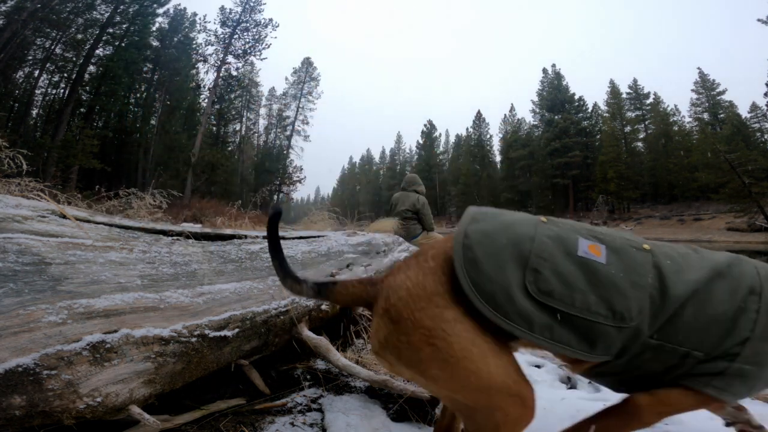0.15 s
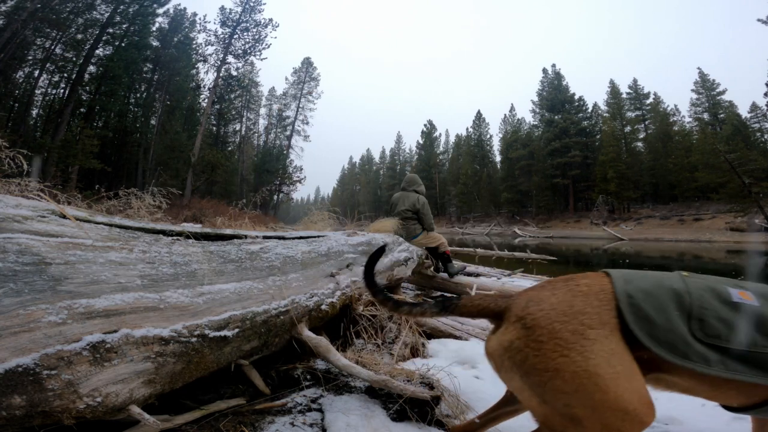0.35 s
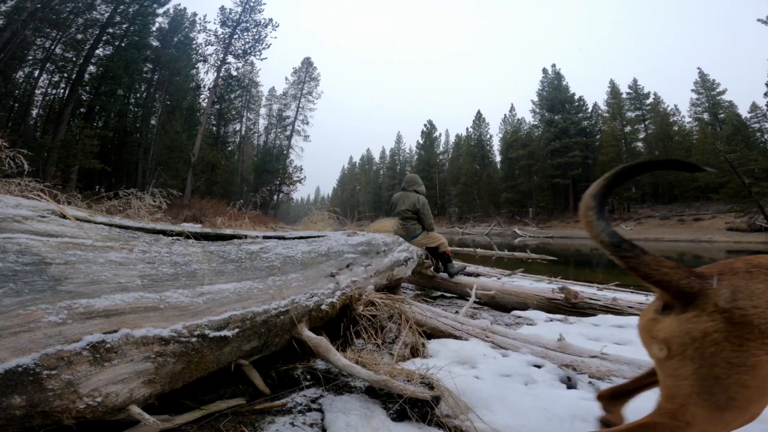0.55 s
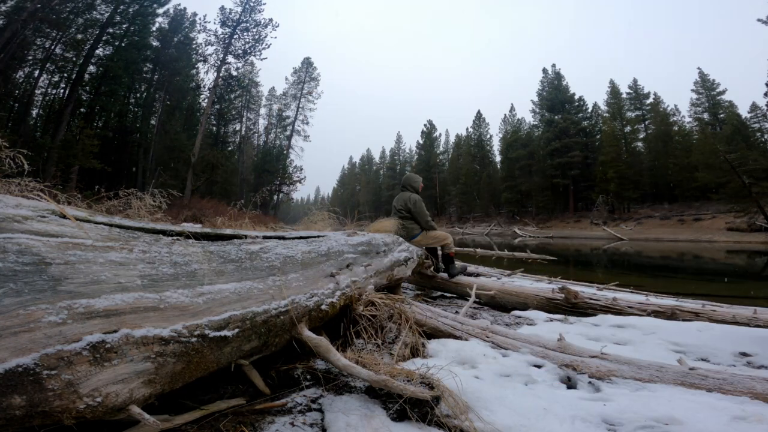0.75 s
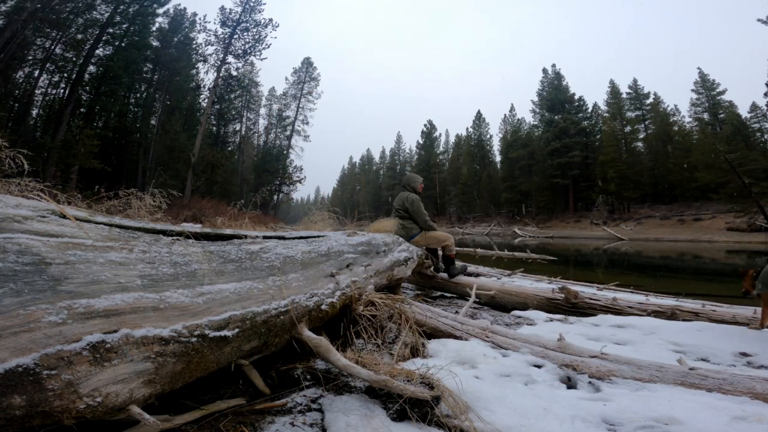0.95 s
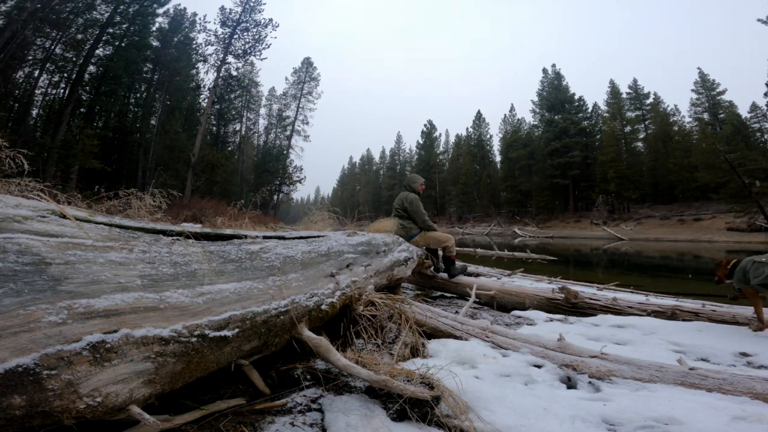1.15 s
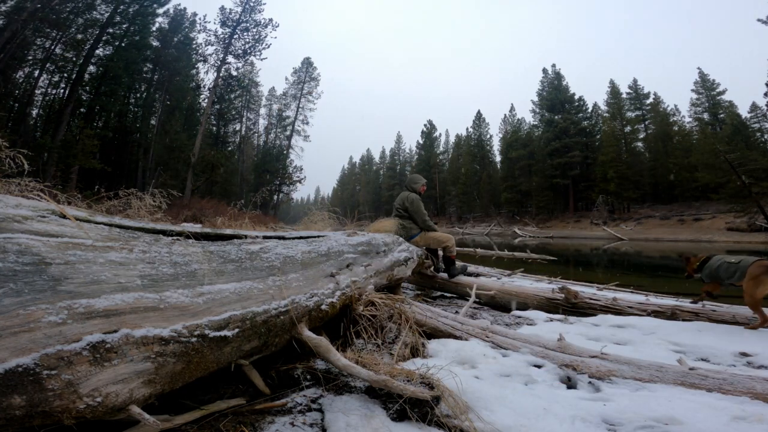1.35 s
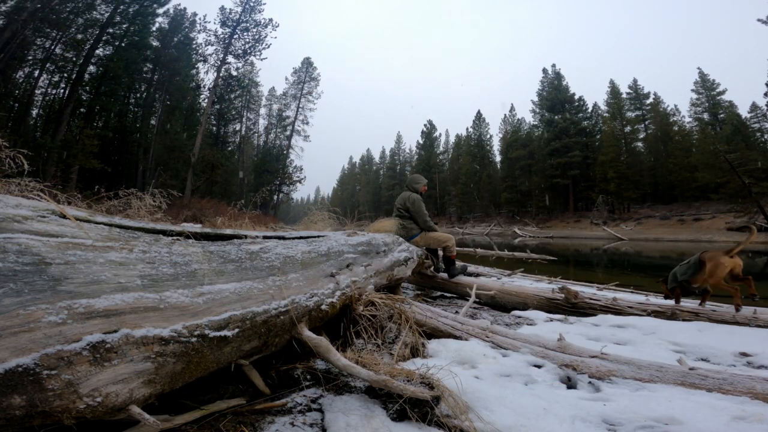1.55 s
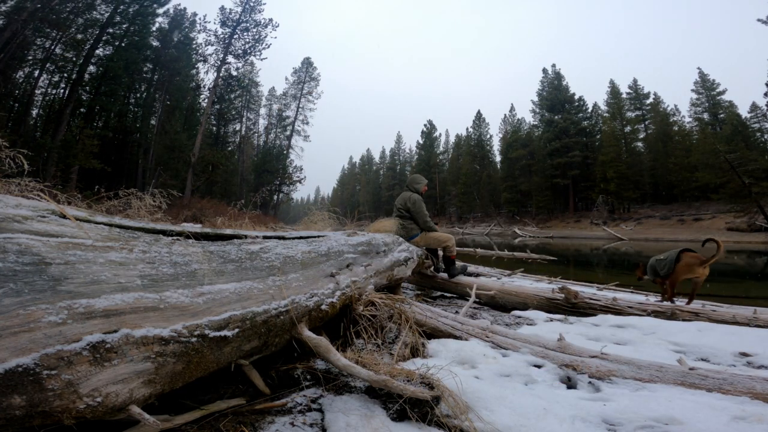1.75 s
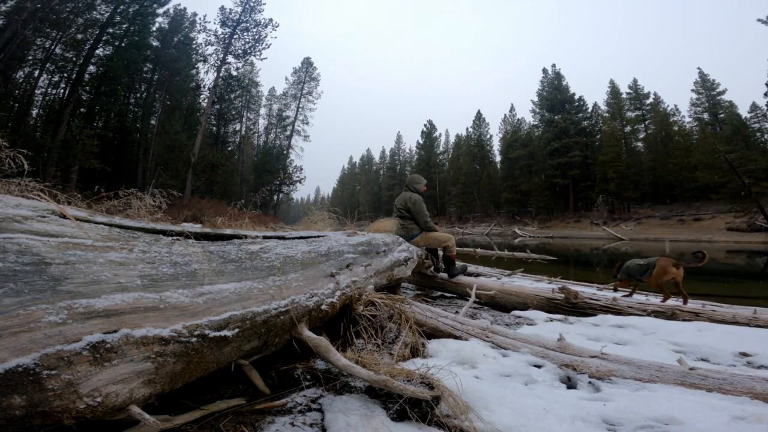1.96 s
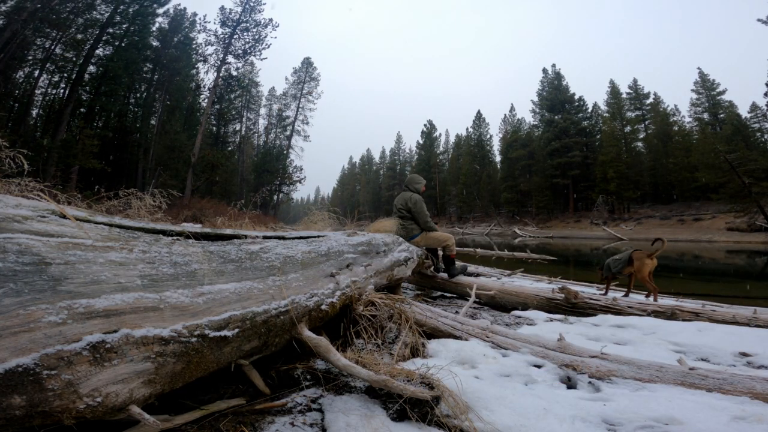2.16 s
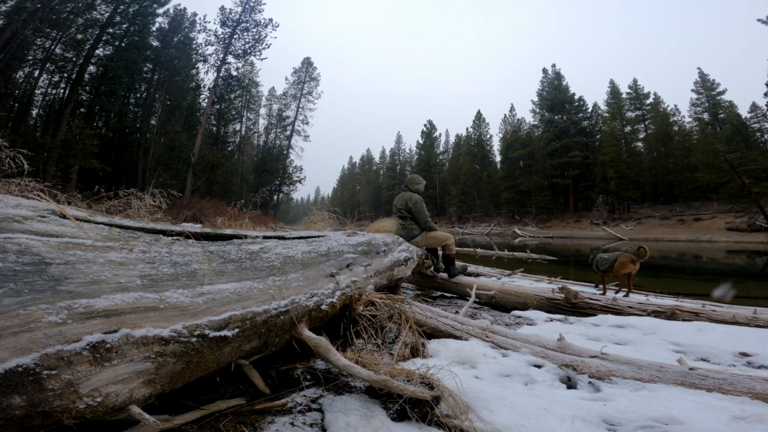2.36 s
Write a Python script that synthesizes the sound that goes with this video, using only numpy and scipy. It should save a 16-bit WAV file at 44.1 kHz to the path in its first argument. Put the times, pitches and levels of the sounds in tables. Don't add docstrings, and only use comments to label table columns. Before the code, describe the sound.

A dog's paws land with a loud crunch on frosty brush, then trot away, snapping twigs

```python
import sys
import numpy as np
from scipy import signal
from scipy.fft import rfft, irfft
from scipy.io import wavfile
from scipy.ndimage import uniform_filter1d, map_coordinates

SR = 44100
rng = np.random.default_rng(int(sys.argv[2]) if len(sys.argv) > 2 else 0)


def master_out(mix):
    frames = np.transpose(np.atleast_2d(mix))
    ceiling = np.clip(frames, -1, 1)
    pcm = np.round(ceiling * 32767).astype(np.int16)
    wavfile.write(sys.argv[1], SR, pcm)


def voltage_ratio(level):
    return 10 ** (np.asarray(level, float) / 20)


N = 110250
T = np.arange(N) / SR

# f/Hz, level/dB
SOFT_GROUND = [(90, -23), (135, -9), (175, 1), (260, -6), (520, -6.5), (720, -21.5), (1500, -66)]


def unit(x):
    return x / np.sqrt(np.mean(x ** 2) + 1e-20)


def noise():
    return rng.standard_normal((2, N))


def wobble(rate):
    knots = rng.standard_normal(int(N * 900 / SR) + 4)
    return map_coordinates(knots, [T * min(rate, 900)])


def sine(hz):
    return np.sin(2 * np.pi * np.cumsum(hz) / SR)


def coloured(x, points):
    f, db = np.transpose(points)
    hz = np.fft.rfftfreq(8192, 1 / SR)
    response_db = np.interp(np.log(hz + 1), np.log(f), db, -90, -90)
    cepstrum = irfft(np.log(voltage_ratio(response_db)))
    cepstrum[1:4096] *= 2
    cepstrum[4097:] = 0
    impulse = irfft(np.exp(rfft(cepstrum)))
    return signal.fftconvolve(x, impulse[None], axes=1)[:, :N]


def patchy(x, depth_db):
    z = signal.stft(x, nperseg=128)[2]

    def blur(bins, frames):
        field = rng.standard_normal(z.shape[1:])
        return unit(uniform_filter1d(uniform_filter1d(field, bins, 0), frames, 1))

    field = blur(3, 3) + .6 * blur(9, 20)
    return signal.istft(z * voltage_ratio(depth_db * field), nperseg=128)[1][:, :N]


def placed(pair, wide, left_db):
    centre, spread = pair[0], wide * pair[1]
    return np.array([centre + spread, centre - spread]) * voltage_ratio([[left_db / 2], [-left_db / 2]])


def gate(s, length, edge):
    rise = T - s + (s <= 0)
    fall = s + length + edge - T
    return np.clip(np.minimum(rise, fall) / edge, 0, 1)


def tail(x, t60):
    t = np.arange(SR) / SR
    h = rng.standard_normal((2, SR)) * voltage_ratio(-60 * t / t60) * (t > .012)
    return signal.fftconvolve(x[None], h / np.linalg.norm(h[0]), axes=1)[:, :N]


def river():
    # f/Hz, level/dB
    water_colour = [(30, -11.5), (115, -21.5), (155, 2), (200, -1.5), (500, -26), (5400, -24.5),
                    (8500, -29.5), (15500, -43.5)]
    # t/s, f/Hz, level/dB
    bubble = [
        (2.15, 240, -80),
        (2.21, 305, -67),
        (2.28, 215, -70),
        (2.4, 215, -82),
    ]
    s, hz, db = np.transpose(bubble)
    gurgle = voltage_ratio(np.interp(T, s, db, -120, -120)) * sine(np.interp(T, s, hz))
    ebb = voltage_ratio(-6 * np.clip((T - 2.15) / .1, 0, 1))
    murmur = unit(coloured(noise(), water_colour)) * voltage_ratio(-64 + 1.53 * wobble(12))
    murmur = murmur + (ebb - 1) * uniform_filter1d(murmur, size=12)
    return placed(murmur, wide=0.71, left_db=-3.5) + gurgle


def trees(bark, middle, far):
    # f/Hz, level/dB
    trunk_colour = [(200, -32), (1800, 7), (6500, -1), (15000, -43)]
    ring = tail(uniform_filter1d(bark * wobble(600), size=7), t60=1.7)
    steps = (middle + .5 * far).mean(0)[None]
    echo = tail(coloured(steps, trunk_colour)[0] * (T > .8), t60=0.46)
    return voltage_ratio(2.5) * ring + voltage_ratio(-14.5) * echo


def squirrel():
    # t/s, level/dB, start f/Hz, sag/(Hz/s), low note level/dB
    calls = [
        (0.823, -56, 4780, 24400, -83),
        (0.944, -48, 4910, 24700, -54),
        (1.065, -46.5, 4840, 21700, -51.5),
        (1.189, -44, 4810, 19620, -58),
        (1.316, -47.5, 5090, 28200, -54.5),
        (1.447, -46, 4810, 14040, -51.5),
        (1.736, -60, 4680, 15700, -61.5),
    ]
    bark_s, plunge_s, plunge_db, plunge_hz_per_s = 0.032, .017, -14, 69000
    low_s, low_at_s, low_hz = .024, 0.02326, 2460
    yip_hz, yip_arch = 5600, 2.5e7
    shake = 85 * wobble(300)
    x = 0
    for s, db, start_hz, sag, low_db in calls:
        u = np.clip(T - s, 0, .08)
        plunge = plunge_hz_per_s * np.clip(u - bark_s, 0, .022)
        hz = start_hz - sag * u - plunge - 350 * np.exp(-u / 0.0025)
        body = gate(s, bark_s * 0.72, 0.01)
        fall = gate(s + bark_s * 0.73, bark_s * 0.45 + plunge_s, 0.0035)
        x = x + voltage_ratio(db + 3.5) * (body + voltage_ratio(plunge_db) * fall) * sine(hz + shake)
        low = gate(s + low_at_s, low_s, .009) + .25 * gate(s, low_at_s, 0.009)
        glide_hz = low_hz + 300 * np.clip(1.5 - u / low_at_s, 0, 1)
        x = x + voltage_ratio(low_db + 1.5) * low * sine(glide_hz + shake)
        yip = sine(yip_hz - yip_arch * (u - .006) ** 2 + shake)
        x = x + voltage_ratio(low_db - 1) * gate(s, .01, 0.0028) * yip
    hoarse = 1 + .45 * wobble(900)
    return x * voltage_ratio(0.31 * wobble(200)) * hoarse


def squeaks():
    slips = [
        (0.688, 0.057, -56, 1346),
        (1.58, 0.02, -41.5, 1730),
        (1.588, 0.021, -34.5, 1680),
        (1.602, 0.026, -40.5, 1796),
        (1.661, 0.0094, -39, 1636),
        (1.853, 0.011, -52, 1940),
        (1.87, 0.0076, -35, 1880),
        (1.877, 0.0093, -34, 1895),
        (1.884, 0.0075, -40.5, 1880),
        (1.895, 0.011, -34.5, 1850),
    ]
    width_hz = 500
    flutter, unsteady = voltage_ratio(1.8 * wobble(width_hz)), 1.25 * wobble(width_hz)
    x = 0
    for s, d, db, hz in slips:
        swell = np.sin(np.pi * np.clip((T - s) / d, 0, 1) ** 0.82) ** 2
        x = x + voltage_ratio(db) * swell * np.sin(2 * np.pi * hz * T + unsteady)
    return flutter * x


def snaps():
    # t/s, peak level/dB, f/Hz
    breaks = [(0.2434, -17.5, 1490), (0.413, -38, 3100), (0.4395, -31.5, 8450), (0.5645, -22.5, 2100),
              (.6415, -39.5, 590), (0.93, -35, 1370), (.961, -43.5, 1170), (1.0071, -37.5, 3970),
              (1.9357, -36, 2400), (1.9778, -42.5, 2570), (1.986, -44, 4700), (2.035, -53, 1580),
              (2.0833, -53, 3020), (2.0957, -48, 3050), (2.1435, -50, 1790), (2.164, -37, 2950),
              (2.176, -38.5, 5140), (2.233, -54, 5060), (2.257, -52, 8700), (2.2669, -40, 5520),
              (2.358, -34.5, 7600), (2.359, -45.5, 3900), (2.457, -54, 11540)]
    cycles, crack_share = 39, 0.19
    x, t = np.zeros(N + 2000), np.arange(1500) / SR
    for s, db, hz in breaks:
        wide = round(SR / hz) + 2
        blunt = np.hanning(wide) / np.sqrt(wide / 3)
        crack = np.convolve(rng.standard_normal(1500), blunt, "same")
        ring = np.sin(2 * np.pi * hz * t) + crack_share * crack
        decay = voltage_ratio(db + 0.5 - 60 * t * (hz + 1500) / cycles)
        x[round(s * SR):][:1500] += decay * (1 - np.exp(-t / 0.00016)) * ring
    return x[:N]


def thumps():
    # start t/s, length/s, level/dB, f/Hz
    blows = [(0, 0.073, -50, 75), (0.206, 0.058, -41.5, 60), (0.238, 0.032, -33, 135),
             (0.266, 0.13, -42.5, 75), (0.334, 0.042, -44, 125), (0.556, 0.048, -44.5, 155),
             (0.577, 0.072, -53.5, 80), (0.636, 0.0089, -45, 110), (0.912, 0.023, -53, 330),
             (1.506, 0.041, -49, 68), (1.595, 0.024, -51.5, 145), (1.917, 0.058, -53.5, 160)]
    fade_db_per_s, rise_s = 42, 0.013
    rough = 1.5 * wobble(60)
    x = 0
    for s, d, db, hz in blows:
        weight = voltage_ratio(db + 3 - fade_db_per_s * np.clip(T - s, 0, d)) * gate(s, d, rise_s)
        x = x + weight * np.sin(2 * np.pi * hz * T + rough)
    return placed([x, np.roll(x, 90)], wide=.12, left_db=0.0)


def pressure(loads, packed, settle_db):
    load = 0
    for s, d, db, swell, low_db in loads:
        through = np.clip((T - s) / d, 0, 1) - .5
        load = load + gate(s, d, 0.0041) * voltage_ratio(db + packed * low_db + swell * through)
    keep = np.exp(-1 / (0.0067 * SR))

    def crumbs(v):
        return voltage_ratio(settle_db) * signal.lfilter([1 - keep], [1, -keep], v)

    creak = .5 * crumbs(load[::-1])[::-1]
    return np.maximum(load, np.maximum(crumbs(load), creak))


def crunch(loads, crust, dull, grains, lumpy_db, dull_db, settle_db, wide, left_db):
    # f/Hz, level/dB
    ear_spread = [(100, -10.5), (2800, 5), (9000, -0.5), (14500, 7.5)]
    u = rng.random((2, N))
    sizes = voltage_ratio(-1.8 * np.log(u[1] + 0.022))
    spikes = (u[0] < grains / SR) * sizes * noise()
    crystals = patchy(noise() + .8 * unit(spikes), depth_db=1.0)
    fizz = unit(coloured(crystals, crust) * voltage_ratio(lumpy_db * wobble(170)))
    push = unit(coloured(noise(), dull) * voltage_ratio(0.39 * wobble(59.64)))
    fizz = np.array([fizz[0], coloured(fizz[1:], ear_spread)[0]])
    low = signal.sosfiltfilt(signal.butter(2, 2200, fs=SR, output="sos"), fizz)
    load, packed = pressure(loads, 0, settle_db), pressure(loads, 1, settle_db)
    ground = push * voltage_ratio(dull_db) * uniform_filter1d(packed, size=300)
    return placed((fizz - low) * load + low * packed + ground, wide, left_db)


def far_bank():
    # start t/s, length/s, level/dB, swell over the length/dB, low part/dB
    far_loads = [(1.866, 0.029, -45.5, 0, 0.5), (1.895, 0.013, -42.5, -6, -3.5),
                 (1.909, 0.019, -43, -11.5, 0), (1.934, 0.0075, -44.5, -3, 0),
                 (1.976, 0.0058, -50, -3, 2.5), (1.984, 0.022, -54, -3, 5), (2.033, 0.01, -62.5, -22, 11),
                 (2.074, 0.025, -55.5, -5, 0), (2.141, 0.021, -56, -1, -2.5),
                 (2.162, 0.035, -57.5, -14, -5.5), (2.229, 0.0041, -58, 0, -21),
                 (2.255, 0.016, -66.5, 0, -13), (2.345, 0.036, -63.5, 1, -0.5),
                 (2.393, 0.022, -62.5, 6, -5), (2.412, 0.015, -62, -3, 5), (2.428, 0.016, -61.5, -11, 3)]
    # f/Hz, level/dB
    far_crust = [(500, -56), (900, -16), (1700, -4), (2900, -4), (4000, -6), (6300, -11), (15800, -36.5)]
    return crunch(far_loads, far_crust, SOFT_GROUND, grains=6700, lumpy_db=2.6, dull_db=-27.0,
                  settle_db=-3.5, wide=0.28, left_db=-3.5)


def trotting():
    # start t/s, length/s, level/dB, swell over the length/dB, low part/dB
    trot_loads = [(.687, 0.0069, -47, -6, -1.5), (.698, 0.023, -58, -5, 3), (.717, 0.006, -58.5, 3, -8),
                  (.741, 0.032, -52, -5.5, -3.5), (.83, 0.023, -52.5, 1, -5), (.852, 0.039, -50.5, -5, 1),
                  (.891, 0.0091, -47, -3, 4), (.906, 0.023, -50, 4, 4.5), (.928, .014, -44.5, -3, -0.5),
                  (.956, 0.0067, -50.5, 4, 3), (.968, 0.023, -57.5, 6, -1),
                  (1.003, 0.0094, -48.5, -2.5, 1.5), (1.066, 0.016, -56.5, 0, -2),
                  (1.1, 0.041, -52.5, -11, -1), (1.162, 0.021, -55, -6, 1), (1.186, 0.028, -47.5, -1, 1.5),
                  (1.233, 0.034, -52, 0, 0), (1.272, 0.0059, -53.5, -5, 0), (1.289, 0.0058, -45.5, 0.5, 4),
                  (1.325, 0.057, -57, 6.5, -2), (1.43, 0.011, -44.5, -3, 0.5),
                  (1.458, 0.017, -55.5, -4, -2), (1.485, 0.039, -50.5, -3, 3),
                  (1.523, 0.046, -51.5, -8.5, 1), (1.58, 0.025, -48.5, 5, 1), (1.605, 0.014, -41.5, -10, 5),
                  (1.622, 0.013, -52.5, -5, 5), (1.658, 0.0055, -51.5, -7, 7),
                  (1.725, 0.022, -64.5, -4, -1)]
    # f/Hz, level/dB
    trot_crust = [(500, -63), (900, -5), (1900, -4.5), (2800, -6.5), (4500, 0), (10000, -12),
                  (15800, -27.5)]
    fading_db = -6.0 - 12.5 * (T - 1)
    return crunch(trot_loads, trot_crust, SOFT_GROUND, grains=8100, lumpy_db=0.25, dull_db=fading_db,
                  settle_db=-3.5, wide=0.25, left_db=-1.5)


def landing():
    # start t/s, length/s, level/dB, swell over the length/dB, low part/dB
    near_loads = [(0, 0.02, -46, 4, 4), (.022, 0.012, -38, 4.5, -3), (.036, 0.11, -50, -4, -3),
                  (.12, 0.035, -43.5, 0.5, -5.5), (.154, 0.05, -32, 5.5, 0), (.203, 0.014, -21, 2, -7),
                  (.219, 0.02, -26, -1, 0.5), (.242, 0.03, -28, -21.5, 1.5), (.272, 0.02, -43, -1, 2),
                  (.292, 0.0314, -33.5, -2.5, 1), (.323, .023, -39.5, -0.5, 6.5),
                  (.347, 0.02, -36.5, -2, 6.5), (.369, 0.024, -40.5, -10, 7), (.393, 0.065, -52.5, 0, -7.5),
                  (.457, 0.043, -47.5, -3, -5), (.498, 0.06, -41.5, -4, 0), (.562, 0.0072, -27, -4.5, -2.5),
                  (.571, 0.025, -35, -4.5, 0.5), (.597, 0.037, -45.5, -6.5, -1),
                  (.639, 0.0066, -47, -7, 3.5), (.646, 0.0059, -51.5, -5, 3)]
    # f/Hz, level/dB
    near_crust = [(300, -37), (700, -6.5), (1500, -2.5), (3000, -5.5), (5400, -3), (10000, -12.5),
                  (15800, -33)]
    # f/Hz, level/dB
    near_ground = [(60, -52), (130, -7.5), (430, -6), (900, -12), (1800, -35)]
    return crunch(near_loads, near_crust, near_ground, grains=5200, lumpy_db=1.24, dull_db=-9,
                  settle_db=-43.5, wide=0.23, left_db=-1.15)


def scene():
    near, middle, far = landing(), trotting(), far_bank()
    paws = near + middle + far
    paws = paws + snaps() * voltage_ratio([[-.8], [.8]]) + squeaks() * voltage_ratio([[-2.5], [2.5]])
    bark = squirrel()
    return paws + thumps() + bark * voltage_ratio([[1.5], [-1.5]]) + trees(bark, middle, far) + river()


def low_pass(x):
    return signal.sosfilt(signal.butter(12, 15720, fs=SR, output="sos"), x)


def record(dry):
    # f/Hz, level/dB
    mic_response = [(12, -24), (48, 0), (13000, 0), (15000, -6), (15900, -24)]
    return low_pass(coloured(dry, mic_response))


dry = scene()
out = record(dry)
master_out(out)
```